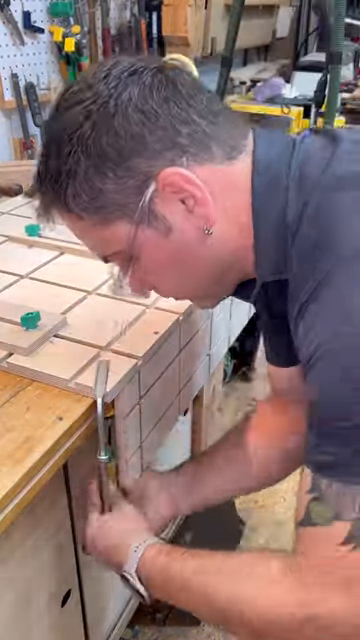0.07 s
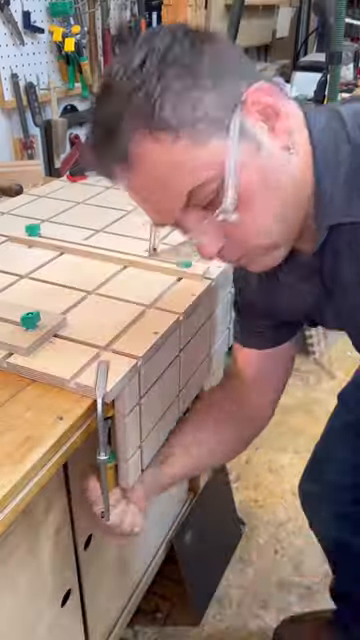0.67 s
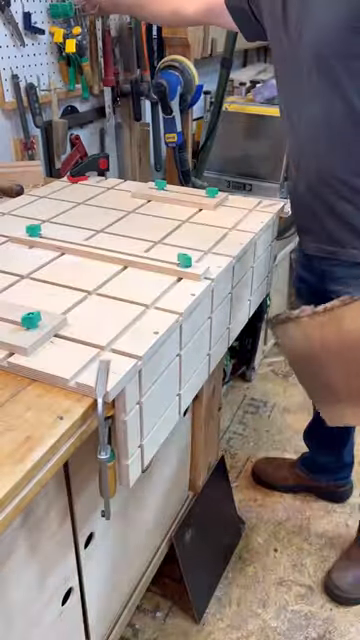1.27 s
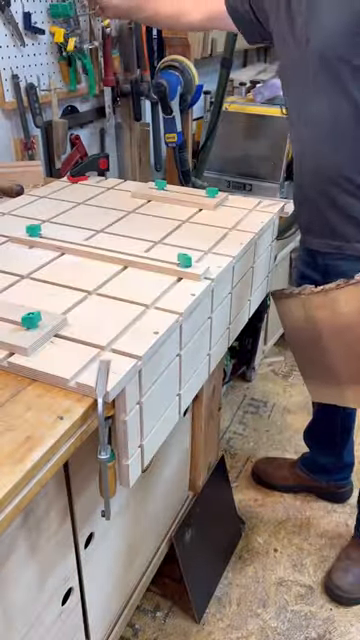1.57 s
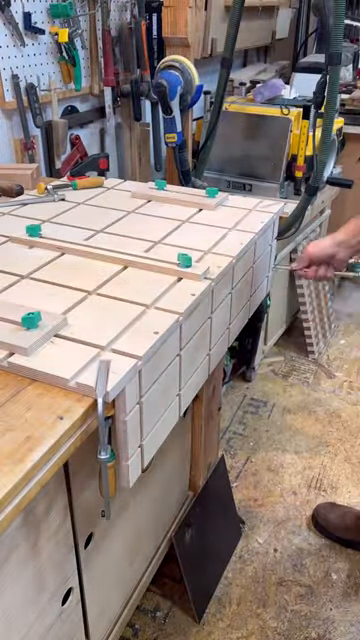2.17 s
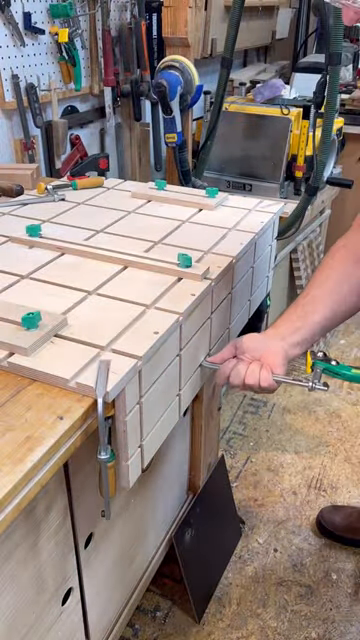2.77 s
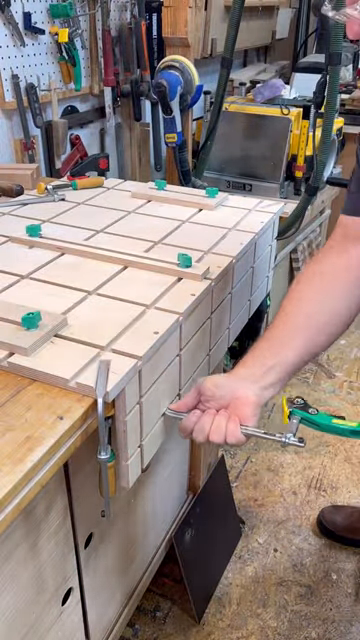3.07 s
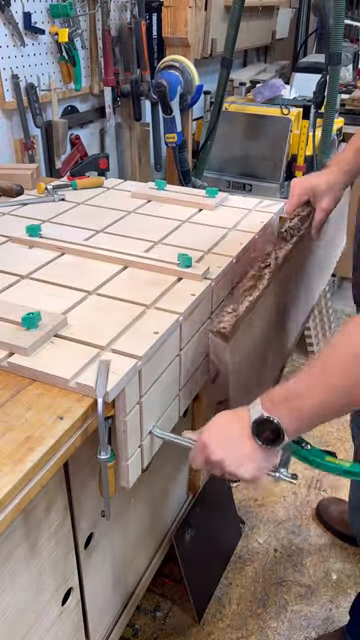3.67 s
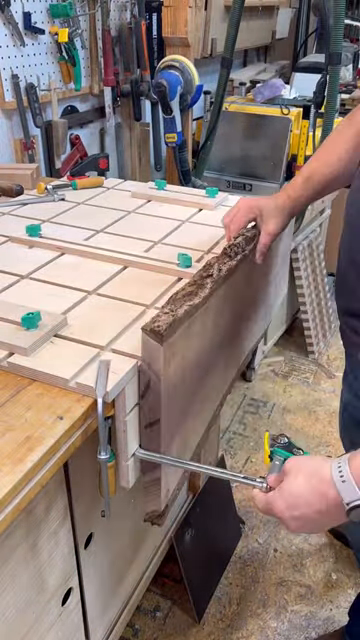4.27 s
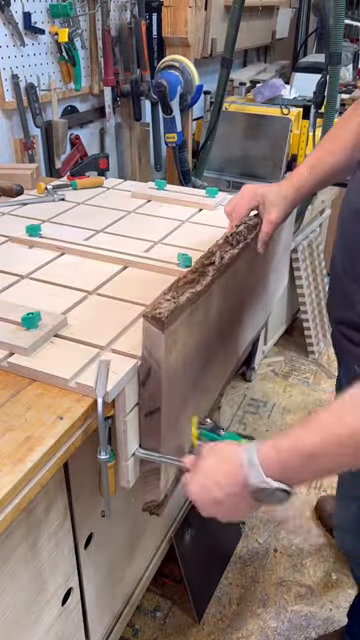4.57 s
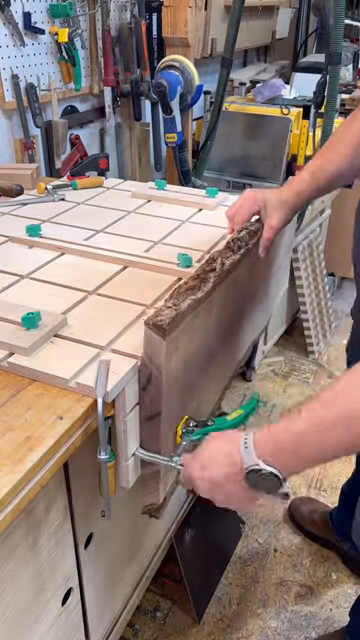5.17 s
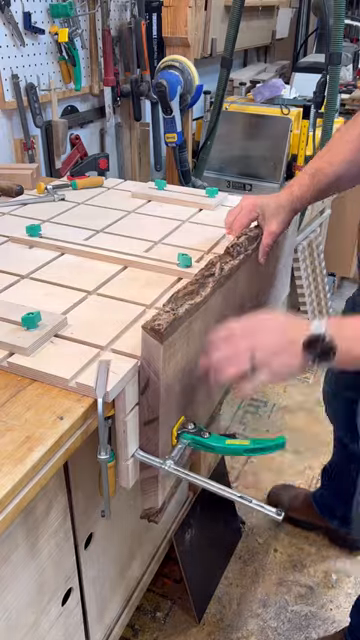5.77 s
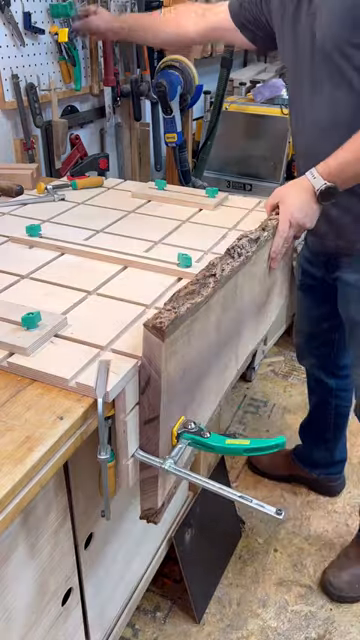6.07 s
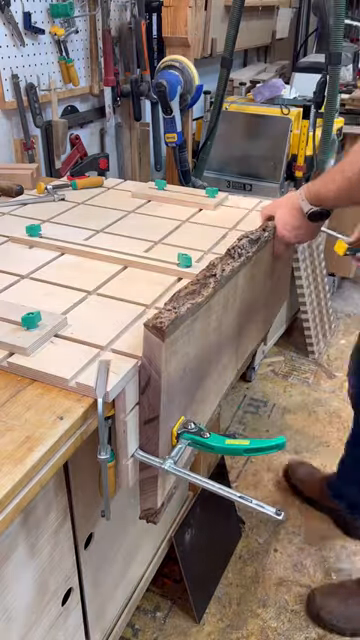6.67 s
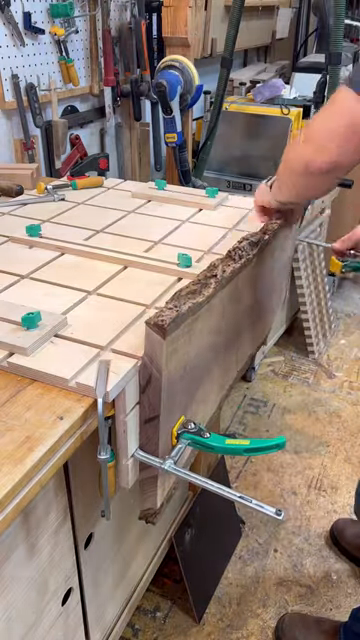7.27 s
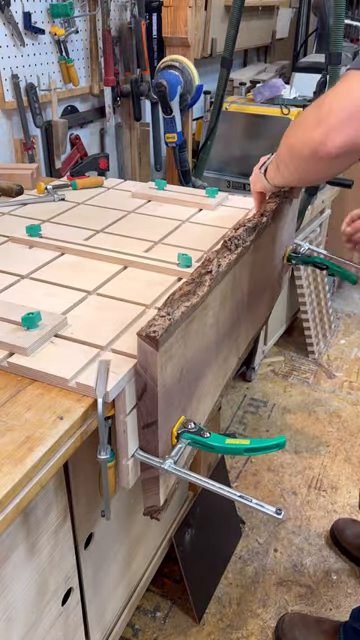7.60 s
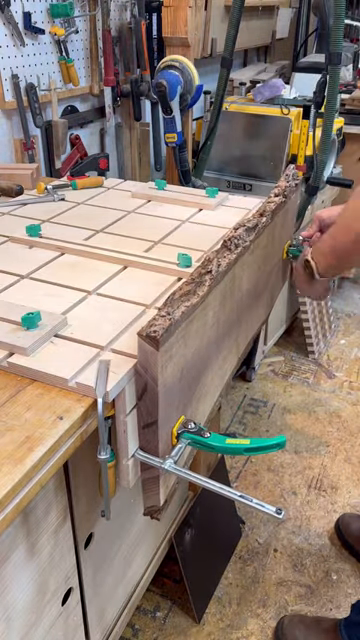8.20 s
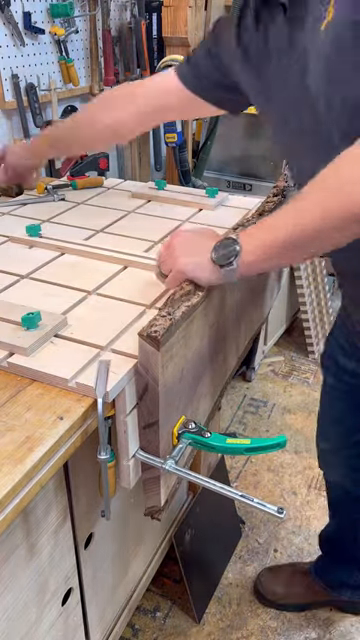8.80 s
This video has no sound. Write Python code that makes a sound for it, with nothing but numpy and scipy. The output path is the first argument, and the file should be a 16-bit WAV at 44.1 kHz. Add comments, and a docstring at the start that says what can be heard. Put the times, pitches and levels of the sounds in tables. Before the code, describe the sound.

Close up in a small, dead-sounding woodshop, two steel clamps are fastened one after the other. A metallic clatter leads to an uneven scraping rattle as a bar slides through a bench slot. Dull bumps of a wooden slab mix with steel clacks, sharp clicks and two quick ratcheting bursts. Two louder hollow knocks stand out in the second half, while hands and sleeves rustle and ventilation hums faintly.

```python
"""Clamping a slab to a workbench

In a small, dead-sounding woodshop a steel clamp is laid down on the bench with a clatter. Its bar sticks, slips
and scrapes along a slot in the bench, the wooden slab knocks into place, and two clamps click tight as their
pawls snap over the teeth. Each blow rings the steel or wood and thumps the bench beneath it. Hands and clothes
rustle over the low hum of the ventilation."""
import sys
import numpy as np
from scipy import signal
from scipy.fft import rfft, irfft, next_fast_len
from scipy.io import wavfile
from scipy.ndimage import uniform_filter1d

SR = 44100
rng = np.random.default_rng(int(sys.argv[2]) if len(sys.argv) > 2 else 0)


def master_out(mix):
    """Clip the mix to full scale and print it as 16-bit PCM to the path in sys.argv[1]."""
    frames = np.transpose(np.atleast_2d(mix))
    ceiling = np.clip(frames, -1, 1)
    pcm = np.round(ceiling * 32767).astype(np.int16)
    wavfile.write(sys.argv[1], SR, pcm)


N = 398663

# Resonances of the two clamps, the steel bar, the slab and the bench: f/Hz, width/Hz, level/dB
NEAR_CLAMP_MODES = [(1450, 400, -13.5), (2600, 1100, -1), (3900, 280, -2), (6050, 620, 6.5),
                    (7700, 1500, -3), (10300, 1300, -2.5)]
FAR_CLAMP_MODES = [(3050, 180, 0), (3610, 280, 2.5), (4640, 590, -3.5), (5700, 1500, -3), (7220, 1070, -5),
                   (10350, 870, 0), (13800, 3000, -12)]
BAR_MODES = [(801, 24, -4.5), (1550, 200, -6.5), (2410, 330, 1), (3310, 620, 5), (3760, 500, 4),
             (5240, 630, 2), (6860, 1100, -3), (9500, 2800, -7)]
SLAB_MODES = [(504, 360, 3), (766, 46, 2.5), (1230, 120, 3.5), (2240, 380, 2.5), (4080, 11000, -0.5),
              (9900, 3000, -36)]
BENCH_MODES = [(201.2, 10, -6.5), (326, 69, -3.5), (392.8, 110, -1), (421.6, 56, -1.5)]


def amp(db):
    """Gain of a level in dB."""
    return 10 ** (np.asarray(db) / 20)


def unit(x):
    """Scales to rms 1."""
    return x / np.sqrt(np.mean(x ** 2, axis=-1, keepdims=True) + 1e-20)


def eq_curve(points, hz):
    """Gain at hz of a curve drawn through points of f/Hz, level/dB."""
    f, db = np.transpose(points)
    return amp(np.interp(np.log(hz + 1), np.log(f + 1), db))


def add(mix, s, sound):
    """Mixes a sound in at time s."""
    part = mix[:, max(round(s * SR), 0):][:, :sound.shape[-1]]
    part += sound[..., :part.shape[1]]


def band(hz, lo_hz, hi_hz, order=8):
    """Gain of a band-pass."""
    return ((1 + (lo_hz / (hz + 1)) ** order) * (1 + (hz / hi_hz) ** order)) ** -.5


def resonances(modes, hz):
    """Gain of a set of modes."""
    return np.sqrt(sum(amp(2 * db) / (1 + (2 * (hz - f) / width) ** 2) for f, width, db in modes))


def causal(gain):
    """Gives a gain curve the phase of a struck body: it rings only after the blow."""
    log_gain = np.log(np.maximum(gain / gain.max(), 1e-5))
    mirrored = np.concatenate([log_gain, log_gain[-2:0:-1]])
    return np.exp(np.conj(signal.hilbert(mirrored)))[:len(gain)]


def coloured(x, gain):
    """Filters a long sound by a function of frequency, to rms 1."""
    size = next_fast_len(N)
    return unit(irfft(rfft(x, size) * gain(np.fft.rfftfreq(size, 1 / SR)), size)[:, :N])


def wander(per_s):
    """A control curve that glides between random values."""
    knots = rng.standard_normal(int(N / SR * per_s) + 2)
    return np.interp(np.linspace(0, len(knots) - 1, N), np.arange(len(knots)), knots)


def repeats(runs, uneven_db):
    """Turns each run into evenly spaced blows of slightly uneven strength."""
    rows = []
    for first, last, gap_s, db, bright_db, thump_db in runs:
        for s in np.linspace(first, last, round((last - first) / gap_s) + 1):
            chance_db = uneven_db * rng.standard_normal()
            rows.append((s, db + chance_db, bright_db, thump_db + chance_db))
    return rows


def by_clamp(rows, far_from_s=6):
    """Splits clicks between the near clamp, tightened first, and the far one."""
    return [row for row in rows if row[0] < far_from_s], [row for row in rows if row[0] >= far_from_s]


def blows(rows, modes, contact_s, chatter_s, chatter_db, clack_db, level_db,
          snap_db=-20, bench_db=-1, bench_lag_s=.0011, size=8192):
    """A snap, a rough contact and a fading chatter drive an object's modes; the bench thumps just after.
    Brightness trades knock for tick; clack_db pushes the band between them forward."""
    # Edges of the thump, knock, clack and tick bands: f/Hz
    edges = [150, 520, 1700, 5500, 16000]
    t, hz, out = np.arange(size) / SR, np.fft.rfftfreq(size, 1 / SR), np.zeros((2, N))
    bodies = [resonances(BENCH_MODES, hz) ** 2] + [resonances(modes, hz)] * 3
    paths = np.array([causal(body * band(hz, lo, hi)) for body, lo, hi in zip(bodies, edges, edges[1:])])
    paths[0] *= np.exp(-2j * np.pi * hz * bench_lag_s)
    contact = t / contact_s * np.exp(1 - t / contact_s)
    chatter = amp(chatter_db) * np.exp(-t / chatter_s) * (1 - np.exp(-t / contact_s))
    force = contact + chatter
    for s, db, bright_db, thump_db in rows:
        drive = force * rng.standard_normal((2, size))
        drive[0, round(contact_s * SR)] += amp(snap_db) * np.linalg.norm(force)  # centred snap
        # each band gets the energy of 20 ms at rms 1
        bands = unit(irfft(paths[:, None] * rfft(drive))) * np.sqrt(SR / 50 / size)
        ring_db = db + level_db + np.array([-clack_db - bright_db, clack_db, bright_db - clack_db])
        add(out, s, np.tensordot(amp([thump_db + bench_db, *ring_db]), bands, 1))
    return out


def pawl_clicks():
    """The pawl snaps over a single tooth and rings the clamp."""
    # Clicks: t/s, level/dB, brightness/dB, thump/dB
    clicks = [(5.068, -38.5, 0.5, -47), (5.097, -27, 4.5, -39), (5.263, -37, 0.5, -40),
              (5.578, -29.0, 7.5, -57), (6.765, -38.5, -2.5, -54), (6.869, -44.5, -5.5, -43),
              (6.9515, -36.5, -1.5, -41.5), (7.827, -41, 11, -44), (7.8355, -40, -11, -35),
              (7.866, -27.5, 6.5, -48), (7.9945, -41, 0.5, -44)]
    near, far = by_clamp(clicks)
    out = blows(near, NEAR_CLAMP_MODES, contact_s=.00068, chatter_s=.0057, chatter_db=-9,
                clack_db=2.65, level_db=1.46, snap_db=-12.5)
    return out + blows(far, FAR_CLAMP_MODES, contact_s=.0004, chatter_s=.0082, chatter_db=-1.5,
                       clack_db=6.5, level_db=.1, snap_db=-1)


def ratchets():
    """Under a firm squeeze the pawl snaps cleanly from tooth to tooth, with little chatter."""
    # Squeezes: first/s, last/s, rough gap/s, level/dB, brightness/dB, thump/dB
    squeezes = [(5.6168, 5.665, .024, -28.5, 11.5, -47), (8.2424, 8.2994, .0114, -29, 14, -54.5)]
    near, far = by_clamp(repeats(squeezes, uneven_db=.3))
    out = blows(near, NEAR_CLAMP_MODES, contact_s=.0008, chatter_s=.006, chatter_db=-10,
                clack_db=2.1, level_db=.1, snap_db=-6)
    return out + blows(far, FAR_CLAMP_MODES, contact_s=.0003, chatter_s=.0055, chatter_db=-10,
                       clack_db=8, level_db=-.65, snap_db=1)


def clatter():
    """Loose steel clamps knock together on the bench top."""
    # Collisions: t/s, level/dB, brightness/dB, thump/dB
    collisions = [(1.7972, -30, -0.5, -67.5), (1.801, -27.0, -4.5, -51), (1.8065, -26.5, -8.5, -29),
                  (1.8138, -30, 5, -36), (1.833, -23.0, 4.5, -37.5), (1.856, -35, -3, -38)]
    # Resonances of the loose steel: f/Hz, width/Hz, level/dB
    steel_modes = [(846, 400, -4), (1540, 180, 9), (2390, 500, 6), (3040, 410, 5.5), (3900, 400, 4),
                   (4800, 700, 1.5), (6850, 2500, -5.5), (11000, 4000, -16.5)]
    return blows(collisions, steel_modes, contact_s=.00067, chatter_s=.007, chatter_db=-2.5,
                 clack_db=3.4, level_db=1.5)


def bar_hits():
    """A clamp's bar or jaw clacks against its slot or stop."""
    # Hits: t/s, level/dB, brightness/dB, thump/dB
    hits = [(2.181, -47, -9, -40), (2.2112, -37, -2, -39), (2.2232, -34, -2.5, -36),
            (2.411, -28.0, 0, -27.5), (2.4995, -36.5, -3, -38), (2.532, -42.5, 3, -33),
            (2.7448, -38, -5.5, -38), (2.763, -46, -7, -33.5), (2.812, -50, 2, -38), (2.991, -36, 0, -38),
            (3.26, -46.5, 4, -42.5), (3.781, -48, 3, -38.5), (3.845, -50, -3, -39.5),
            (4.59, -36.5, -2, -44.5), (4.5992, -26.5, -2.5, -26.5), (4.6155, -40.5, -12.5, -44),
            (4.773, -50, -5, -48.5), (4.912, -43, -3.5, -37), (6.198, -29, 4.0, -39),
            (6.351, -37.5, 2, -41.5), (6.402, -50.5, 8, -60), (6.431, -44, 6.5, -51),
            (6.915, -48, -1, -39.5), (6.986, -42, -1.5, -45), (7.034, -40.5, 0.5, -40.5),
            (7.4485, -33.5, 5, -35), (7.4642, -25.5, 1.5, -29), (7.4805, -25.5, 2, -30),
            (7.4925, -27.0, -2, -29), (7.7218, -42, -1, -33.5), (7.793, -43, -1.5, -38),
            (8.006, -37, -4, -38.5)]
    return blows(hits, BAR_MODES, contact_s=.001, chatter_s=.006, chatter_db=-1.5,
                 clack_db=2, level_db=-.05)


def bar_judders():
    """The bar sticks and slips along the slot in an even rattle."""
    # Rattles: first/s, last/s, rough gap/s, level/dB, brightness/dB, thump/dB
    rattles = [(2.2875, 2.631, .043, -41, 0.5, -33), (2.8445, 3.197, .0503, -43, 1, -34.5)]
    return blows(repeats(rattles, uneven_db=1.5), BAR_MODES, contact_s=.0016, chatter_s=.009,
                 chatter_db=-5, clack_db=2, level_db=0, bench_lag_s=.0021)


def friction(levels, body, hiss, catch_db, catches_per_s, snap_db, snaps_per_s,
             grain_db=.5, snap_s=.00033, patchy_db=3.2, size=512):
    """Tiny slips bunch up as surfaces catch and snap free; levels holds the body and hiss envelopes."""
    triggers = rng.random(N) < snaps_per_s / SR
    snaps = signal.lfilter([1], [1, -np.exp(-1 / (snap_s * SR))], triggers)
    slips = rng.standard_normal((2, N))
    slips *= amp(grain_db * wander(1500) + catch_db * wander(catches_per_s)) + amp(snap_db) * snaps
    # as the point of contact moves, narrow bands come and go
    spectra = signal.stft(slips, nperseg=size)[2]
    patches = uniform_filter1d(rng.standard_normal(spectra.shape[1:]), size=5, axis=0)
    patches = unit(uniform_filter1d(patches, size=6, axis=1))
    slips = signal.istft(spectra * amp(patchy_db * patches), nperseg=size)[1][:, :N]
    return levels[0] * coloured(slips, body) + levels[1] * coloured(slips, lambda hz: eq_curve(hiss, hz))


def bar_slides(drag_db=1, drag_body_db=-3, scrape_body_db=-8, attack_s=.0028, release_s=.0081, hum_db=3):
    """The bar drags along, scrapes harder before each catch and sets the bench humming."""
    # How hard the bar drags: t/s, level/dB
    drag_curve = [(2.11, -61), (2.182, -62), (2.308, -63), (2.37, -52), (3.038, -48), (3.106, -45),
                  (3.236, -54.5), (3.3, -78)]
    # Scrapes swelling to a catch: start/s, end/s, final level/dB, rise/dB
    scrapes = [(2.126, 2.154, -42, 14), (2.26, 2.282, -32.5, 10), (2.363, 2.416, -30.5, 4.5),
               (2.667, 2.754, -35, 11), (2.841, 2.882, -44, 9), (4.495, 4.608, -37.5, 13.5),
               (7.427, 7.506, -29, 6.5)]
    # Hiss of sliding steel: f/Hz, level/dB
    hiss = [(880, -31), (1500, -23), (2190, -14), (2640, 2.5), (2880, -3.5), (3920, 10.5), (4240, 6.5),
            (9370, -0.5), (16000, -8)]
    t, scrape = np.arange(N) / SR, np.zeros(N)
    s, db = np.transpose(drag_curve)
    drag = amp(np.interp(t, s, db) + drag_db) * (t > s[0]) * (t < s[-1])
    for start, end, final_db, rise_db in scrapes:
        gate = np.clip((t - start) / attack_s, 0, 1) * np.exp(-np.maximum(t - end, 0) / release_s)
        scrape += gate * amp(final_db + np.interp(t, [start, end], [-rise_db, 0]))
    body_level = amp(drag_body_db) * drag + amp(scrape_body_db) * scrape
    body = lambda hz: resonances(BAR_MODES, hz) * band(hz, 300, 1380)
    hum = coloured(rng.standard_normal((2, N)), lambda hz: resonances(BENCH_MODES, hz) ** 2)
    grind = friction([body_level, drag + scrape], body, hiss,
                     catch_db=5.5, catches_per_s=190, snap_db=-4, snaps_per_s=55)
    return amp(hum_db) * body_level * hum + grind


def wood_bumps():
    """The slab and the clamp pads bump the bench with a dull, woody knock."""
    # Bumps: t/s, level/dB, brightness/dB, thump/dB
    bumps = [(.981, -53, -17.5, -46), (1.104, -54, -8.5, -43), (1.3265, -40.5, -5.5, -25),
             (1.392, -44.5, 2.5, -36), (3.434, -48, -10.5, -66), (4.001, -38, -9, -32.5),
             (4.028, -46, -5.5, -45), (4.074, -49, -10.5, -44), (4.09, -53.5, -8, -43.5),
             (4.984, -57.5, -12, -49), (5.205, -54, -6.5, -55), (5.481, -41.5, -6, -40),
             (5.7655, -42, -6.5, -34.5), (5.877, -54, -10, -43), (7.179, -50, -2.5, -34.5),
             (8.433, -42.5, -5, -37), (8.919, -44, -7, -40)]
    return blows(bumps, SLAB_MODES, contact_s=.00096, chatter_s=.014, chatter_db=-7,
                 clack_db=.64, level_db=-.97)


def hollow_knocks(decay_cycles=.53, tick_db=-20, tick_s=.0068, overtone=1.86, overtone_db=-12):
    """A heavily damped panel swings a few times under a faint tick; it is too small to radiate bass."""
    # Things handled around the shop: t/s, level/dB, f/Hz
    knocks = [(0.4236, -35.5, 420), (.448, -38.5, 1070), (0.76, -21, 727), (0.805, -28, 716),
              (1.9775, -29, 1040), (2.05, -31, 1028), (6.2416, -12.5, 1095), (6.2837, -30, 1073),
              (8.8821, -9, 813)]
    t, out = np.arange(2048) / SR, np.zeros((2, N))
    for s, db, hz in knocks:
        age = t * hz / decay_cycles
        envelope = (age / 2) ** 2 * np.exp(2 - age)
        swing = np.sin(2 * np.pi * hz * t) + amp(overtone_db) * np.sin(2 * np.pi * hz * overtone * t)
        tick = amp(tick_db) * np.exp(-t / tick_s) * rng.standard_normal((2, len(t)))
        add(out, s, amp(db) * (envelope * swing + tick))
    return signal.sosfilt(signal.butter(2, [300, 3200], "band", fs=SR, output="sos"), out)


def rings():
    """Small metal pings and deep thuds, each a single struck mode dying away."""
    # Struck modes: t/s, f/Hz, level/dB, t60/s
    strikes = [(0.982, 45, -43, .06), (1.655, 10000, -43.5, 0.049), (1.71, 10530, -49, .04),
               (1.768, 9700, -51.5, .03), (5.011, 45, -50, .06), (5.266, 2900, -19.5, 0.024),
               (5.771, 1490, -51, .2)]
    t, out = np.arange(SR // 2) / SR, np.zeros((2, N))
    for s, hz, db, t60 in strikes:
        add(out, s, amp(db - 60 * t / t60) * np.sin(2 * np.pi * hz * t))
    return out


def squeals_and_hum():
    """Narrow tones swell and fade: short rubbing squeals and a faint low machine hum."""
    # Narrow tones: start/s, end/s, f/Hz, width/Hz, level/dB
    tones = [(0.9, 0.963, 490, 82, -43), (4.51, 4.63, 2880, 630, -34.5), (4.49, 4.63, 5600, 1100, -41.5),
             (5.75, 6.37, 310, 23, -49)]
    out = np.zeros((2, N))
    for start, end, pitch_hz, width_hz, db in tones:
        swell = signal.windows.hann(round((end - start) * SR))
        mode = [(pitch_hz, width_hz, 0)]
        tone = coloured(rng.standard_normal((2, N)), lambda hz: resonances(mode, hz) ** 2)
        add(out, start, amp(db) * swell * unit(tone[:, :len(swell)]))
    return out


def finger_taps(touch_db=-67, spread_db=3, bright_db=-3, thump_db=-66, count=55):
    """Fingers and clamp handles tap the wood, with fainter touches at random moments."""
    # Taps: t/s, level/dB, brightness/dB, thump/dB
    taps = [(0.127, -61.5, -2.5, -68), (1.287, -55.5, 4.5, -50), (3.732, -68.5, 4, -49),
            (4.292, -66, -1.5, -67), (5.5529, -53, -3, -62), (6.075, -53, 3.5, -47.5), (6.171, -49, 1, -43),
            (6.474, -50, -2.5, -50), (7.131, -61, 0.5, -61), (7.691, -54, -2.5, -49),
            (8.119, -66, -4.5, -54)]
    touches = [((when + 1) / 2 * N / SR, touch_db + spread_db * force, bright_db + spread_db * tone,
                thump_db) for when, force, tone in rng.uniform(-1, 1, (count, 3))]
    return blows(list(taps) + touches, SLAB_MODES, contact_s=.00099, chatter_s=.006, chatter_db=-5,
                 clack_db=1.6, level_db=-1)


def rustles(stroke_db=-1, taper=.3, fidget_body_db=-72, fidget_hiss_db=-76, fidget_spread_db=6):
    """Skin and cloth brush over wood; each stroke swells and fades, and small movements fill the gaps."""
    # Hands, sleeves and bark rubbing: start/s, end/s, level/dB, brightness/dB
    strokes = [(0.261, 0.303, -51.5, -17), (0.388, 0.472, -55, -12), (0.575, 0.79, -66, -1),
               (0.863, 1.051, -61, 0), (1.111, 1.286, -51.5, -5.5), (1.349, 1.44, -57.5, -2),
               (1.536, 1.658, -54, 2), (3.46, 3.566, -77, 22), (3.774, 3.896, -49, 2.5),
               (3.994, 4.152, -59, -13), (4.374, 4.438, -50, -7.5), (5.859, 6.044, -53.5, -1),
               (6.091, 6.275, -50, -1), (6.343, 6.465, -49, -1), (6.55, 6.571, -66.5, 17),
               (6.666, 6.749, -50.5, -9.5), (6.786, 7.099, -53, -2), (7.215, 7.274, -49.5, -5.5),
               (7.49, 7.592, -50.5, -7.5), (7.706, 7.817, -53.5, 2), (8.533, 8.57, -54, 5),
               (8.819, 9.054, -48, -15)]
    # Hiss of the brushing: f/Hz, level/dB
    hiss = [(1060, -31), (1800, -15.5), (3030, 0), (3910, 0.5), (4450, -0.5), (9770, 0.5), (16000, -8)]
    fidget_db = fidget_spread_db * wander(30)
    levels = amp([fidget_body_db + fidget_db, fidget_hiss_db + fidget_db])
    for start, end, db, bright_db in strokes:
        swell = amp(stroke_db) * signal.windows.tukey(round((end - start) * SR), taper)
        add(levels, start, np.outer(amp([db, db + bright_db]), swell))
    body = lambda hz: band(hz, 270, 1800, order=6)
    return friction(levels, body, hiss, catch_db=6.5, catches_per_s=60, snap_db=11, snaps_per_s=65)


def ventilation(level_db=-51.5, swell_db=2.5):
    """A low rush of air, gently wavering in level."""
    # Tone of the moving air: f/Hz, level/dB
    spectrum = [(25, -41.5), (55, -32.5), (85, -18.5), (125, -5.5), (160, -4.5), (190, 3), (260, -1.5),
                (380, -2.5), (520, -14.5), (700, -31), (1200, -35), (2500, -39), (4500, -41), (7500, -34),
                (11000, -45.5), (16000, -50.5)]
    level = amp(level_db + swell_db * wander(6))
    return level * coloured(rng.standard_normal((2, N)), lambda hz: eq_curve(spectrum, hz))


def room(x, early_db=-9, early_t60=.064, late_db=-24, late_t60=.14, damping_hz=11000, predelay_s=.0025):
    """Close clutter scatters each sound at once; a faint tail follows."""
    t = np.arange(SR // 2) / SR
    scatter = rng.standard_normal((2, 2, len(t))) * (t > predelay_s)
    early = amp(early_db) * unit(scatter[0] * amp(-60 * t / early_t60))
    late = amp(late_db) * unit(scatter[1] * amp(-60 * t / late_t60))
    response = signal.lfilter(*signal.butter(1, damping_hz, fs=SR), early + late) / np.sqrt(len(t))
    return x + signal.fftconvolve(x, response, axes=1)[:, :N]


def scene():
    """Mixes the sources in the shop as mid and side, then spreads them to left and right."""
    # Stereo width, as the gain of the side channel: f/Hz, level/dB
    width = [(350, -47.5), (700, -28.5), (1400, -19.5), (2500, -7), (4500, -11.5), (8000, -23),
             (15000, -8.5)]
    impacts = pawl_clicks() + clatter() + bar_judders() + bar_hits() + wood_bumps() + finger_taps()
    impacts += ratchets() + hollow_knocks() + rings()
    textures = squeals_and_hum() + bar_slides() + rustles()
    mid, side = room(impacts + textures) + ventilation()
    side = irfft(rfft(side) * eq_curve(width, np.fft.rfftfreq(N, 1 / SR)), N)
    return np.array([mid + side, mid - side])


def record(dry):
    """Clips at full scale and cuts the very top of the treble."""
    cutoff_hz = 16250
    lowpass = signal.firwin(301, cutoff_hz, window=("kaiser", 8), fs=SR)
    return signal.oaconvolve(np.clip(dry, -1, 1), lowpass[None], "same", axes=1)


dry = scene()
out = record(dry)
master_out(out)
```